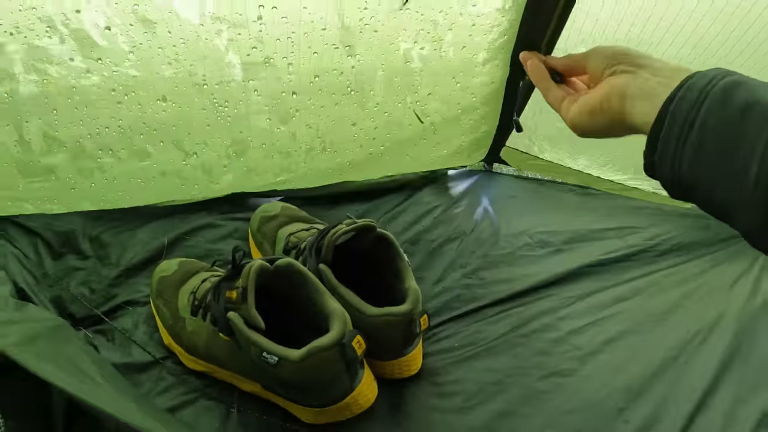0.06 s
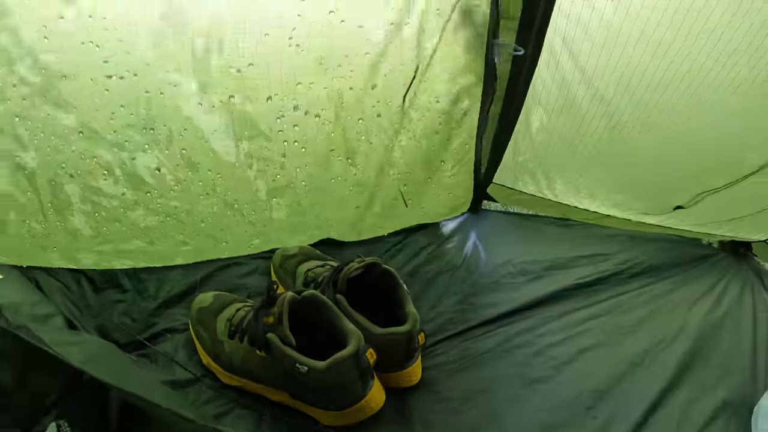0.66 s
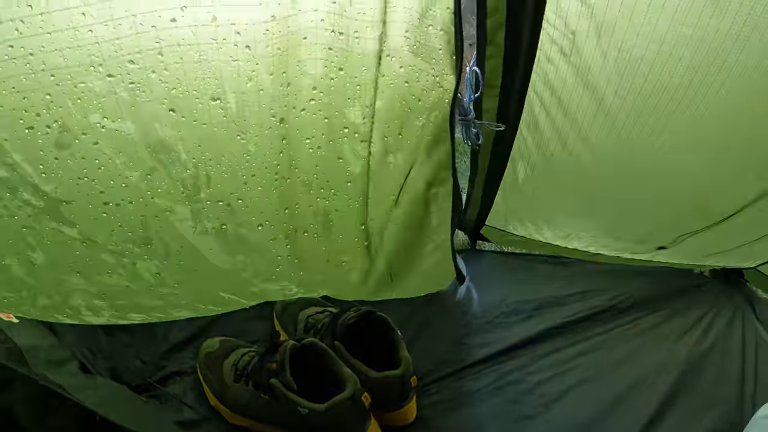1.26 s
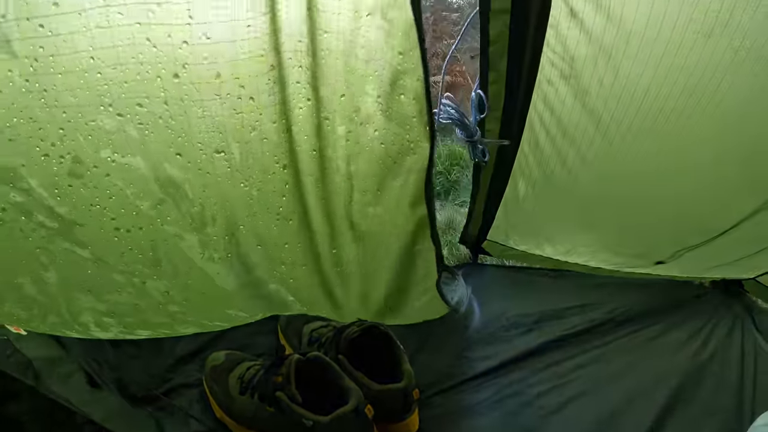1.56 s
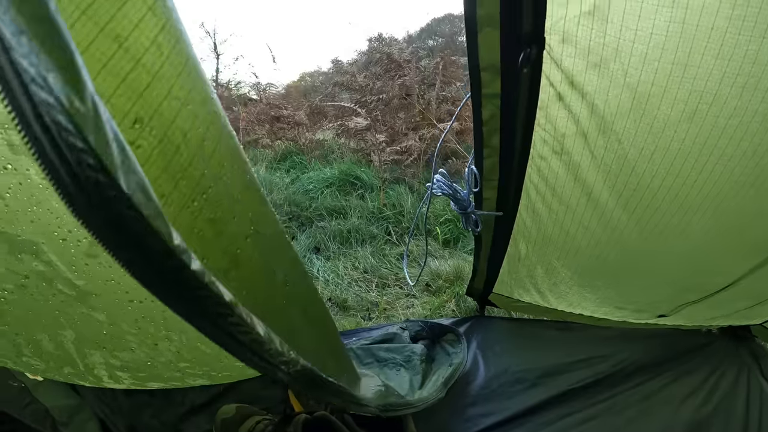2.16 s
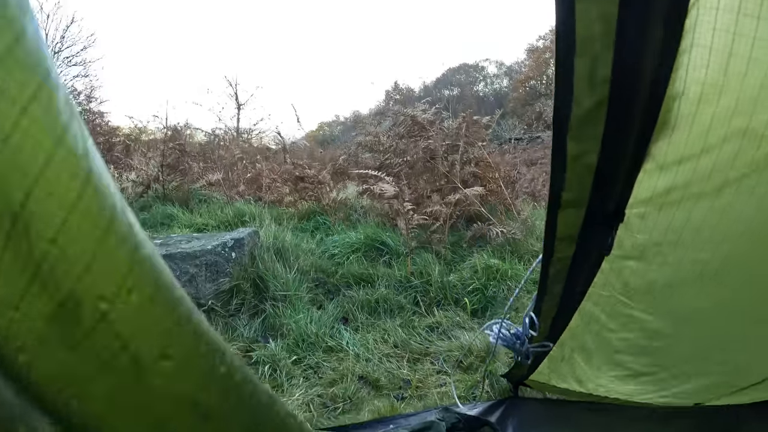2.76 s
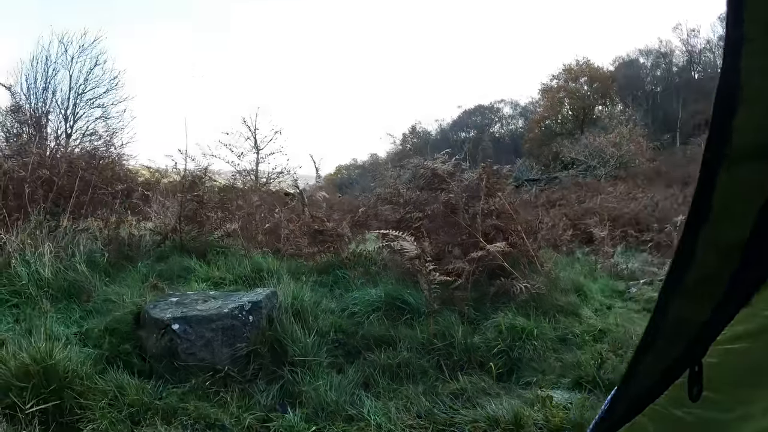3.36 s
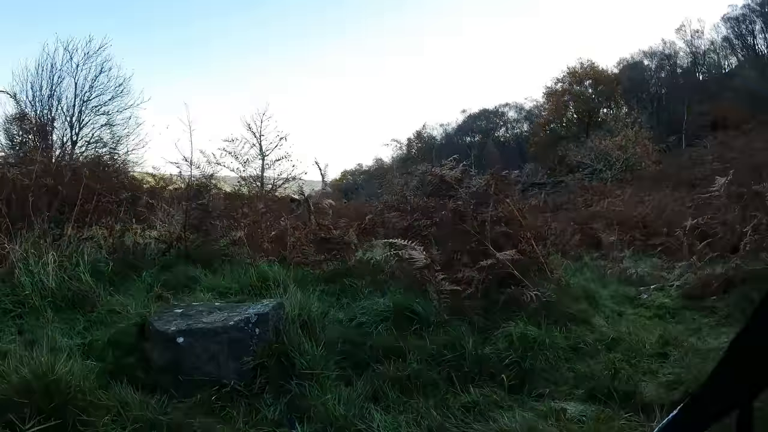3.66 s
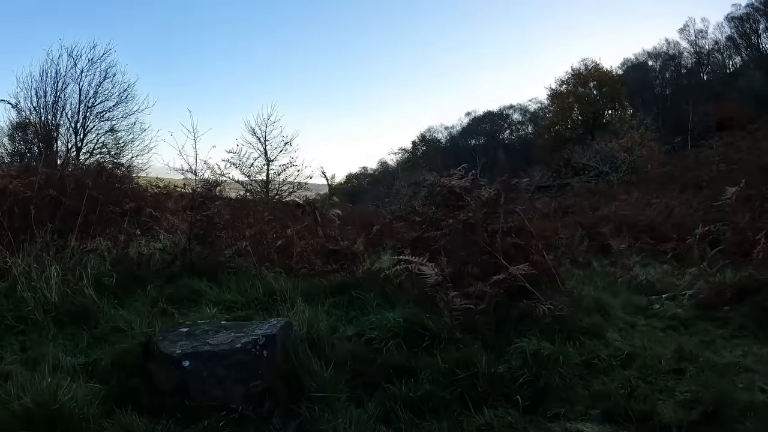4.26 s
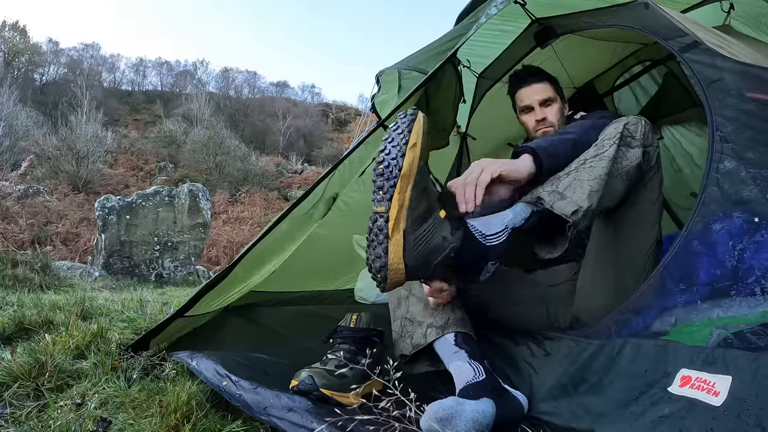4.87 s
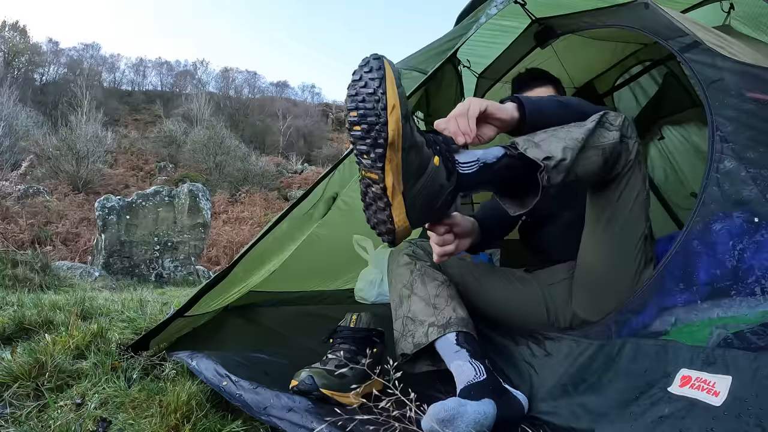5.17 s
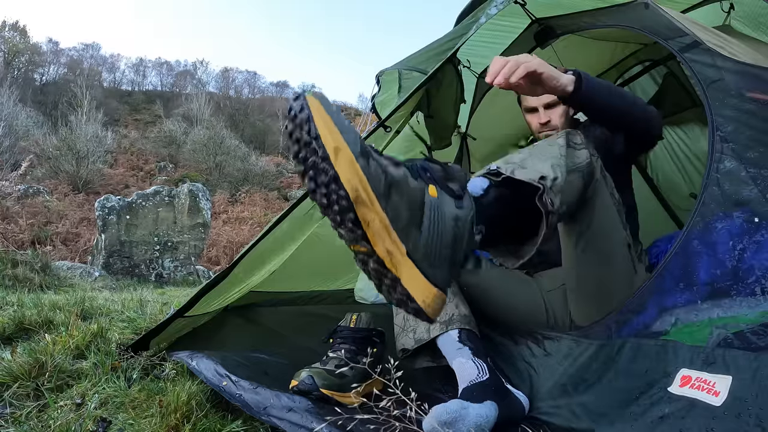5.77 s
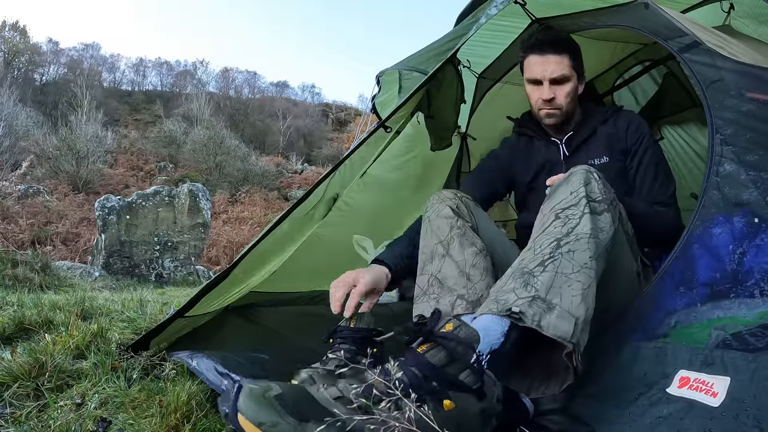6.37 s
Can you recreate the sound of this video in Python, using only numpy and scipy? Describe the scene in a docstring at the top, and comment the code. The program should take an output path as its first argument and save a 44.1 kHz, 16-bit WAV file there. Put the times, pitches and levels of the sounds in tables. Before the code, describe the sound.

A long, close rasp of a tent door zip slows to clicks, followed by wind bumps and the rustle and pop of a shoe going on.

```python
"""A tent door zip buzzes open close to the microphone: the slider runs over the teeth, slows and ends
in single clicks. The door cloth brushes past; wind, handling and soft bumps rumble in the microphone
ports over a faint outdoor hush. Then, with a low hum in the distance, a shoe is tugged onto a foot,
pops home and is set down among rustling clothes."""
import sys
import numpy as np
from scipy import signal
from scipy.fft import rfft, irfft, next_fast_len
from scipy.io import wavfile
from scipy.ndimage import uniform_filter1d, map_coordinates

SR = 44100
rng = np.random.default_rng(int(sys.argv[2]) if len(sys.argv) > 2 else 0)


def generate_wav(signal):
    """Clip the signal to [-1, 1] and save it as 16-bit WAV at the path in sys.argv[1]."""
    frames = np.transpose(np.atleast_2d(signal))
    scaled = np.clip(frames, -1, 1) * 32767
    pcm = np.round(scaled).astype(np.int16)
    wavfile.write(sys.argv[1], SR, pcm)


N = 286721
TOP_HZ = 15100  # the microphone's band limit


def amp(db):
    """Decibels to gain."""
    return 10 ** (np.asarray(db) / 20)


def unit(x):
    """Scaled to rms 1."""
    return x / np.sqrt(np.mean(x ** 2) + 1e-20)


def even(x, size=2205):
    """Scaled to a running rms of 1."""
    power = np.abs(uniform_filter1d(uniform_filter1d(x * x, size), size))
    return x / np.sqrt(power + 1e-9 * np.mean(x * x))


def along(points, hz):
    """Read (f/Hz, value) points on a log frequency axis."""
    f, v = np.transpose(points)
    return np.interp(np.log(hz + 1), np.log(f + 1), v)


def clock():
    """Time of each sample."""
    return np.arange(N) / SR


def gains(rows):
    """A gain per sample for each dB column, fading out beyond the rows."""
    s, *cols = np.transpose(rows)
    outside = np.maximum(0, np.maximum(s[0] - clock(), clock() - s[-1]))
    return [amp(np.interp(clock(), s, c)) * np.exp(-outside / 0.15) for c in cols]


def strokes(rows, shape=1.34):
    """Swells (t/s, level/dB, rise/s, fall/s) added in power; shape 1 is pointed, 2 bell-like."""
    power = 0
    for s, db, rise, fall in rows:
        t = clock() - s
        flank = np.abs(t / np.where(t < 0, rise, fall)) ** shape
        power += (amp(db) * np.exp(-np.minimum(flank, 20))) ** 2
    return np.sqrt(power)


def wobble(rate, size=N):
    """A smooth random curve, rate knots a second."""
    knots = rng.standard_normal(int(size * rate / SR) + 4)
    return map_coordinates(knots, [np.arange(size) * rate / SR])


def filtered(x, response):
    """x times a response of frequency."""
    m = next_fast_len(x.shape[-1] + 8192, True)
    return irfft(rfft(x, m) * response(np.fft.rfftfreq(m, 1 / SR)), m)[..., :x.shape[-1]]


def noise(spectrum):
    """Coloured noise of rms 1."""
    return unit(filtered(rng.standard_normal(N), lambda hz: amp(along(spectrum, hz))))


def struck(x, spectrum, size=2048):
    """x through a causal (minimum-phase) body with this spectrum."""
    cepstrum = irfft(np.log(amp(along(spectrum, np.fft.rfftfreq(size, 1 / SR)))))
    cepstrum[1:size // 2] *= 2
    cepstrum[size // 2 + 1:] = 0
    return signal.oaconvolve(x, irfft(np.exp(rfft(cepstrum))))[:len(x)]


def resonate(x, modes):
    """x through (f/Hz, width/Hz, level/dB) resonances."""
    return filtered(x, lambda f: sum((-1) ** k * amp(db) * 1j * f * w / (c * c - f * f + 1j * f * w)
                                     for k, (c, w, db) in enumerate(modes)))


def grainy(spectrum, grain_db, rate):
    """Friction noise of rms 1: threads catch and let go rate times a second."""
    return unit(struck(rng.standard_normal(N) * amp(grain_db * wobble(rate)), spectrum))


def around(spectrum, hz):
    """A spectrum narrowed towards hz."""
    return [(f, db - 2.4 * np.log2(f / hz) ** 2) for f, db in spectrum]


def tinted(x, rows, octaves, folds_db=1.9):
    """Lift a gliding band of (t/s, f/Hz, lift/dB) rows; shifting folds add chance colour."""
    hz, s, z = signal.stft(x, SR, nperseg=512)
    at, centre, lift_db = np.transpose(rows)
    folds = uniform_filter1d(uniform_filter1d(rng.standard_normal(z.shape), 3, axis=0), 8, axis=1)
    band = np.exp(-(np.log2((hz[:, None] + 1) / np.interp(s, at, centre)) / octaves) ** 2)
    colour_db = np.interp(s, at, lift_db) * band + folds_db * unit(folds)
    return signal.istft(z * amp(colour_db), nperseg=512)[1][:N]


def add(track, s, sound):
    """Mix a sound in at time s."""
    part = track[round(s * SR):][:len(sound)]
    part += sound[:len(part)]


# open air around the tent: f/Hz, level/dB (table levels are relative throughout)
HUSH = [(76, -57), (130, -11.5), (152, -8), (205, -11), (311, -20.5), (542, -25.5), (856, -26), (2980, -31),
        (5200, -34.5), (7140, -38), (9430, -50), (11700, -42.5), (14900, -60)]
def outdoor_hush():
    """Faint, wide air: part is common to both channels, part is each one's own."""
    return amp(-65) * (noise(HUSH) + 1.19 * np.array([noise(HUSH), noise(HUSH)]))


# tones of the hum, and the noise around them: f/Hz, level/dB
HUM = [(91.5, -53), (150.7, -52), (188.4, -59.5)]
DRONE = [(30, 1.5), (80, 12.5), (125, -24), (185, -8), (260, -5), (350, -15), (700, -16), (2000, -21),
         (8000, -50)]
def distant_hum():
    """Far off, low tones waver in a bed of noise, fading in at 4.4 s."""
    tones = sum(amp(db + 2.5 * wobble(9.9)) * np.sin(2 * np.pi * hz * clock() + 2 * wobble(13))
                for hz, db in HUM)
    return (tones + amp(-53.5) * noise(DRONE)) * np.clip((clock() - 4.4) / 0.24, 0, 1)


# strength of the wind, and of handling as the microphone is carried out: t/s, level/dB
WIND = [(0, -28.5), (1.5, -35), (2.2, -31), (3.4, -32), (3.8, -29), (4.55, -35), (5, -43.5), (5.2, -76),
        (5.9, -79), (6.05, -48), (6.5, -50.5)]
CARRY = [(1.95, -56), (2.12, -35), (2.6, -43.5), (4.3, -66), (4.6, -70)]
# their spectra: f/Hz, level/dB
WIND_RUMBLE = [(8, -5), (14, 5), (22, 3), (30, -23.5), (45, -9.5), (65, -26.5), (90, -26), (130, -43),
               (200, -59), (300, -117)]
HANDLING = [(20, -24), (40, -5), (65, 21), (90, 8.5), (120, 2), (200, -34), (400, -83)]
def microphone_rumble():
    """Wind and handling right on the microphone ports, stronger on the right."""
    ports = amp([[-3], [2]])
    gusts = even(noise(WIND_RUMBLE), size=4410) * ports
    gusts += 0.27 * np.array([noise(WIND_RUMBLE), noise(WIND_RUMBLE)])
    handling = gains(CARRY)[0] * even(noise(HANDLING)) * ports
    return amp(3) * gains(WIND)[0] * gusts + handling


# blows to the microphone and of the shoe: t/s, level/dB, f/Hz, t60/s, rise/s
BUMPS = [(2.718, -40.5, 288, 0.044, 0.0034), (3.484, -1, 23.6, 0.29, 0.028), (3.501, -19, 61.6, 0.3, 0.002),
         (3.886, -18, 69, 0.13, 0.0094), (4.25, -10.5, 66.6, 0.13, 0.0091),
         (4.25, -42.5, 258, 0.035, 0.0019), (4.294, -19.5, 29.1, 0.29, 0.024),
         (4.493, -15.5, 23.5, 0.22, 0.031), (5.208, -30.5, 88, 0.073, 0.0039),
         (5.509, -8, 64.4, 0.063, 0.0038), (5.508, -20, 800, 0.0044, .0006),
         (5.511, -21, 234, 0.025, 0.00068), (5.667, -18.5, 178.4, 0.046, 0.0089),
         (6.098, -25.5, 40.6, 0.24, 0.0053), (6.125, -25.5, 85, 0.07, 0.0032)]
def bumps():
    """Each soft blow swings a few cycles of a dying tone."""
    out, t = np.zeros(N), np.arange(SR // 2) / SR
    for s, db, hz, t60, rise in BUMPS:
        onset = 1 - np.exp(-(t / rise) ** 2)
        add(out, s, amp(db - 60 * t / t60) * onset * np.sin(2 * np.pi * hz * t))
    return out


# knocks of the shoe: t/s, level/dB
KNOCKS = [(5.485, -31), (5.508, -18.5), (6.068, -31.5), (6.101, -29), (6.298, -32), (6.328, -29.5)]
# body of the sole: f/Hz, level/dB
SOLE = [(60, -42), (140, 6), (350, -3.5), (600, -10), (1100, -12.5), (2000, -15), (4500, -29),
        (12000, -56.5)]
def shoe_knocks(grit=0.18):
    """The sole knocks dully: one push, then a short crunch."""
    out, t = np.zeros(N), np.arange(SR // 2) / SR
    for s, db in KNOCKS:
        crunch = grit * rng.standard_normal(len(t)) * amp(-60 * t / 0.039)
        knock = struck((t == 0) + crunch, SOLE)
        add(out, s, amp(db) * knock / np.abs(knock).max())
    return out


# door cloth, then a sleeve: t/s, level/dB, rise/s, fall/s
BRUSHES = [(2.22, -41.5, 0.054, 0.085), (2.38, -54, 0.078, 0.39), (2.97, -59, 0.93, 0.14),
           (3.42, -51, 0.34, 0.23), (3.51, -44, 0.031, 0.041), (4.02, -63, .02, .05),
           (4.16, -62, 0.078, 0.089), (4.37, -60.5, 0.071, 0.04)]
# sliding nylon: f/Hz, level/dB
NYLON = [(150, -8), (280, 1), (500, -2), (800, -8.5), (1100, 1.5), (1900, -4), (3500, -6.5), (5300, -7),
         (8500, -16.5), (12000, -22), (15000, -32)]
def cloth_brush():
    """Cloth slides past the microphone in swells of friction noise."""
    return amp(-3.5) * strokes(BRUSHES) * grainy(NYLON, grain_db=2, rate=220)


# strokes of sock, shoe and trousers: t/s, swish/dB, rise/s, fall/s, scuff/dB, hiss/dB, brightest f/Hz
RUBS = [(4.645, -57.5, 0.055, 0.071, -70, -70, 1490), (4.78, -58.5, 0.041, 0.055, -58.5, -74, 1500),
        (4.875, -58, 0.052, 0.044, -52.5, -74, 1960), (5.025, -50.5, 0.08, 0.022, -48.5, -73, 1800),
        (5.07, -44.5, 0.058, 0.048, -46.5, -55.5, 3160), (5.19, -49.5, 0.15, 0.17, -58, -61, 2340),
        (5.37, -51, 0.13, 0.12, -66, -63.5, 1400), (5.495, -37.5, 0.047, 0.042, -39.5, -48.5, 2360),
        (5.679, -45, 0.022, 0.038, -61, -54, 2600), (5.725, -50.5, 0.075, 0.046, -75, -55, 2760),
        (5.975, -55, 0.063, 0.065, -58, -61.5, 2430), (6.095, -45, 0.04, 0.049, -41, -47, 1710),
        (6.305, -40, 0.064, 0.04, -41.5, -42.5, 1100), (6.45, -46, 0.072, 0.077, -47, -49.5, 2120)]
# low, middle and high part of a rub: f/Hz, level/dB
SCUFF = [(70, -23), (130, 2), (280, 3), (550, -2.5), (1000, -17), (1400, -19), (2500, -38)]
SWISH = [(450, -8), (650, -1), (880, -4), (1200, 3), (1750, 0), (2450, -0.5), (3200, 0), (5200, -7),
         (8000, -40), (12000, -62)]
HISS = [(2940, -16.5), (5000, -5), (7270, -6), (8840, -14), (10100, -13), (13800, -26), (14600, -49),
        (14900, -47)]
def shoe_rubs(lift_db=5):
    """As the shoe is tugged on, each rub gives a low scuff, a swish and a hiss."""
    s, swish_db, rise, fall, scuff_db, hiss_db, hz = np.transpose(RUBS)
    scuff, swish, hiss = (strokes(zip(s, db, rise, fall)) for db in (scuff_db, swish_db, hiss_db))
    bright = [(at, centre, lift_db) for at, centre in zip(s, hz)]
    scuff *= amp(-3) * grainy(SCUFF, grain_db=3.5, rate=300)
    swish *= even(tinted(grainy(SWISH, grain_db=1.5, rate=610), bright, octaves=1))
    hiss *= amp(-1.5) * grainy(HISS, grain_db=1.5, rate=450)
    return scuff + swish + hiss


# brief sounds of zip, cloth and shoe: t/s, level/dB, centre f/Hz, t60/s
SHIVERS = [(1.704, -33, 4860, 0.029), (1.808, -35.5, 9000, 0.035), (2.754, -44, 3720, 0.046),
           (2.977, -51.5, 7000, 0.02), (3.352, -40.5, 3980, 0.055), (3.413, -42, 4200, 0.053),
           (3.498, -35, 1940, 0.03), (4.702, -45, 3200, 0.014), (5.482, -35.5, 1910, 0.18),
           (5.493, -35, 950, 0.046), (5.508, -23, 900, 0.02), (5.657, -43.5, 1790, 0.069),
           (5.806, -44.5, 2620, 0.029), (6.066, -41, 1600, 0.041), (6.287, -38, 820, 0.17),
           (6.33, -39, 1100, 0.042)]
# their shared body: f/Hz, level/dB
SHIVER_BODY = [(200, 3), (450, 20), (750, -4), (1100, 6), (1500, 3), (1900, -0.5), (2500, -1.5), (3200, -1),
               (4300, -2.5), (6000, -7), (9000, -17.5), (15000, -28)]
def snags_and_pops():
    """The slider snags, pullers and cloth flick, the shoe scrapes, squeaks and pops: shivers of noise."""
    out, t = np.zeros(N), np.arange(SR // 6) / SR
    for s, db, hz, t60 in SHIVERS:
        shiver = unit(struck(rng.standard_normal(len(t)), around(SHIVER_BODY, hz)))
        add(out, s, amp(db - 60 * t / t60) * shiver)
    return out


# the zip's last teeth: t/s, crack/dB, centre f/Hz, thud/dB
LAST_TEETH = [(2.2752, -32, 1504, -30), (2.2874, -37, 1500, -33.5), (2.3, -47, 1710, -33),
              (2.3171, -35, 1302, -37), (2.3304, -35, 1200, -35), (2.343, -39, 1400, -36),
              (2.3585, -33, 1300, -33), (2.368, -33, 1300, -35), (2.38, -34, 1700, -30),
              (2.3935, -33, 1810, -26), (2.4132, -30, 1290, -30), (2.45, -33, 1860, -30),
              (2.496, -35, 1020, -35.5), (2.529, -32.5, 1060, -31), (2.555, -37, 1670, -40),
              (2.61, -39.5, 1000, -46), (2.635, -32, 1050, -35), (2.642, -38, 1010, -43)]
# a tooth's crack, and its tug on the cloth: f/Hz, level/dB
CRACK = [(200, 7), (320, -4), (430, 13.5), (750, -6), (1050, 4.5), (1450, -3), (1900, 1), (2500, -3),
         (3100, -1), (4200, -4), (6000, -3), (9000, -11), (12000, -5), (15000, -24)]
THUD = [(30, -10), (110, 2.5), (260, 0.5), (450, -11.5), (900, -20), (3000, -47)]
def last_teeth(crack_t60=0.014, tail_t60=0.065, tail_db=-16):
    """Teeth let go one by one: a crack, a short shiver and a thud of the cloth."""
    out, t = np.zeros(N), np.arange(SR // 6) / SR
    decay = amp(-60 * t / crack_t60) + amp(tail_db - 60 * t / tail_t60)
    thud = struck(-1. * (t == 0), THUD)
    for s, db, hz, thud_db in LAST_TEETH:
        crack = struck(rng.standard_normal(len(t)) * decay, around(CRACK, hz))
        add(out, s, amp(db + 15.5) * crack / np.linalg.norm(crack))
        add(out, s, amp(thud_db + 3.5) * thud / np.abs(thud).max())
    return out


# two tugs on the door: t/s, level/dB, rise/s, fall/s
TUGS = [(2.08, -37.5, 0.11, 0.17), (2.23, -31.5, 0.062, 0.061)]
# door cloth modes: f/Hz, width/Hz, level/dB
DOOR_MODES = [(106.9, 29.9, 4.5), (158.8, 15, 6), (210, 42.6, 0), (286, 52, -2), (414, 21.9, -3.5),
              (507, 18, -11)]
def slack_door(kicks, bursts, stop_s):
    """The teeth drum the loosened door until the slider's run ends."""
    drum = even(resonate(kicks + 0.037 * bursts * rng.standard_normal(N), DOOR_MODES))
    return drum * strokes(TUGS) * np.clip((stop_s - clock()) / 0.018 + 1, 0, 1)


# rattles of the tab: t/s, level/dB, rise/s, fall/s
RATTLES = [(2.055, -50, .025, 0.026), (2.135, -45.5, .015, .02), (2.235, -46.5, 0.047, 0.035)]
# its modes: f/Hz, width/Hz, level/dB
TAB_MODES = [(3170, 83, 0), (5000, 176, -11), (5785, 250, -7)]
def pull_tab(grit):
    """The pull tab rattles on slow teeth."""
    return strokes(RATTLES) * even(resonate(grit, TAB_MODES))


# the tape's four lowest partials: t/s, then level/dB of each
BUZZ = [(0.0, -51, -45.5, -62, -46.5), (0.09, -57, -44, -74, -40), (0.19, -52, -57, -60, -40),
        (0.25, -40.5, -41, -45, -38), (0.39, -36.5, -34, -48, -38.5), (0.45, -31.5, -33.5, -33, -49.5),
        (0.58, -39.0, -38.5, -51, -33), (0.65, -38.5, -38, -42.5, -50), (0.71, -38, -36, -38, -41),
        (0.85, -47.5, -43.5, -43.5, -35), (0.93, -40, -38.0, -38, -37), (1.03, -39, -41.5, -51, -37),
        (1.13, -43.5, -54.5, -46, -49), (1.22, -37.5, -36.5, -50, -45), (1.27, -52, -46, -61.5, -42),
        (1.34, -48.0, -41.5, -56.0, -59), (1.4, -39, -49.5, -54, -45), (1.49, -40.5, -43.5, -70, -46),
        (1.61, -42.5, -60, -70, -46.5), (1.71, -38, -50.5, -80, -58), (1.8, -43.5, -45, -51, -45.5),
        (1.89, -47, -59, -52, -53.5), (1.95, -42.5, -50.5, -69.0, -48)]
def tape_buzz(teeth, steady, waver_db=2.4, swell_db=0.7, shake_rad=0.52):
    """The tape buzzes at the tooth rate, shakier in higher partials and where the pull is uneven."""
    out = np.zeros(N)
    for k, level in enumerate(gains(BUZZ), 1):
        waver = unit(amp(waver_db * wobble(140) + swell_db * k * wobble(40)))
        shake = shake_rad * k * (1 - steady) * wobble(110)
        out += np.sqrt(2) * level * waver * np.cos(2 * np.pi * k * teeth + shake)
    return out


# rasp of the teeth: f/Hz, level/dB
RASP = [(1200, -21.5), (2000, -6), (2550, 0), (3200, 1.5), (4200, -2.5), (5300, -1.5), (6900, -5),
        (8300, -13), (10000, -13.5), (11000, -19.5), (12100, -15.5), (15000, -34)]
# the slider's gliding band: t/s, f/Hz, lift/dB
SLIDER_BAND = [(0, 3600, 2), (.5, 4050, -2), (.75, 3220, 5), (.95, 3780, 8.5), (1.12, 4310, 4.5),
               (1.45, 4772, 6.5), (1.75, 4560, 4), (1.9, 2657, 1), (2.1, 2940, 6), (2.3, 2940, 7)]
def slider_rasp(bursts):
    """Each tooth scrapes through the slider in a bright burst of noise."""
    return even(tinted(struck(bursts * rng.standard_normal(N), RASP), SLIDER_BAND, octaves=0.55))


def teeth_ring(teeth, rate, spectrum, reach_hz, waver_db, smear):
    """Upper partials of the tooth rate swell, fade and wander as the slider travels along the cloth."""
    out = np.zeros(len(teeth))
    for k in range(5, 21):
        swing, drift = wobble(24, len(teeth)), wobble(70, len(teeth))
        level = amp(along(spectrum, k * rate) + waver_db * swing)
        level /= np.sqrt(1 + (k * rate / reach_hz) ** 4)
        phase = 2 * np.pi * k * teeth + smear * np.sqrt(k) * drift + rng.uniform(0, 2 * np.pi)
        out += level * np.cos(phase)
    return even(np.pad(out, (0, N - len(teeth))))  # silent once the teeth come singly


# the slider's speed: t/s, tooth rate/Hz
SPEED = [(0, 272), (0.093, 313), (0.129, 280), (0.18, 308), (0.21, 349), (0.3, 376), (0.412, 419),
         (0.471, 420), (0.54, 387), (0.596, 377), (0.615, 308), (0.64, 288), (0.685, 338), (0.72, 317),
         (0.78, 286), (0.824, 244), (0.86, 272), (0.885, 253), (0.93, 305), (0.985, 300), (1.042, 227),
         (1.08, 315), (1.172, 327), (1.25, 240), (1.318, 167), (1.356, 198), (1.416, 272), (1.445, 262),
         (1.472, 342), (1.499, 298), (1.552, 284), (1.644, 243), (1.709, 250), (1.764, 236), (1.819, 262),
         (1.872, 187), (1.96, 153), (2.069, 109), (2.222, 139), (2.31, 96)]
# evenness of the pull: t/s, tonal share (0-1)
STEADY = [(0, 0.7), (.4, 0.57), (.95, 0.55), (1.08, 0.35), (1.45, 0.63), (1.75, 0.3), (2.1, 0.1)]
# strength of the zip's layers: t/s, tape rubbing/dB, chatter/dB, rasp/dB
PULL = [(0.0, -42.5, -38.5, -36.5), (0.14, -44.5, -45, -40.5), (0.17, -36, -39.5, -38.5),
        (0.31, -40, -43, -35), (0.39, -39, -38.5, -32.5), (0.51, -41.5, -48, -35), (0.57, -47, -36.5, -33),
        (0.63, -38, -39.5, -36), (0.77, -39.5, -34.5, -33.5), (0.83, -45, -37.5, -35.5),
        (0.9, -40, -34.5, -33), (0.96, -46, -37.5, -34.5), (1.07, -39.0, -36.5, -31),
        (1.16, -40, -38.5, -32), (1.33, -39, -46.5, -40.5), (1.4, -44, -38.5, -36.5),
        (1.47, -42.5, -43.5, -37), (1.58, -41, -39.5, -42), (1.71, -41.5, -37, -39.5),
        (1.77, -45.5, -45.5, -43), (1.87, -46, -42, -44), (1.97, -44.0, -48.5, -48.5),
        (2.05, -49, -49, -45), (2.11, -41, -49.5, -44.5), (2.24, -49, -46.0, -45.5),
        (2.26, -47, -47.5, -49), (2.31, -47, -57, -56)]
# the tape's rubbing, the teeth's chatter and their whine at top speed: f/Hz, level/dB
TAPE = [(60, -4.5), (150, 1.5), (300, -2.5), (500, -3.5), (1050, 2.5), (1400, 2.5), (2200, -20),
        (6000, -34.5)]
CHATTER = [(800, -16.5), (1200, 0), (1450, 2), (1900, -1), (2400, -5.5), (3200, -9.5), (5200, -22.5),
           (15000, -52)]
WHINE = [(1700, -18), (2400, -2), (3000, -3), (3700, 2.5), (5200, -3), (7000, -22), (8500, -19)]
def zipper(stutter=0.025, tooth_s=0.0025, catch_db=0.73, catch_hz=32):
    """Close up, each tooth snaps out of the slider with a click and a rasp, shaking tape, door and tab."""
    steady = np.clip(np.interp(clock(), *np.transpose(STEADY)), 0, 1)
    rate = np.interp(clock(), *np.transpose(SPEED)) * np.exp(stutter * wobble(55))
    speed = rate / rate.max()
    teeth = np.cumsum(rate) / SR  # teeth passed so far
    stop_s = SPEED[-1][0]
    end = int(stop_s * SR)
    tooth = np.arange(1, int(teeth[end]) + 1)
    slip, size_db, tug = rng.standard_normal((len(tooth), 3)).T
    # a slack, slow zip lets its teeth go unevenly
    scatter = 0.03 + 0.09 * (1 - np.interp(tooth, teeth, steady)) ** 3
    at = np.interp(tooth + scatter * slip, teeth, np.arange(N)).astype(int)
    snaps = np.bincount(at, amp(size_db), N)
    # steady rubbing fills the gaps between teeth only at speed
    bursts = signal.lfilter([1], [1, -np.exp(-1 / (tooth_s * SR))], snaps) + speed ** 1.8

    ring = teeth_ring(teeth[:end], rate[:end], CHATTER, reach_hz=2200, waver_db=7, smear=0.52)
    whine = teeth_ring(teeth[:end], rate[:end], WHINE, reach_hz=TOP_HZ, waver_db=5.5, smear=0.36)
    grit = snaps + 0.27 * bursts * rng.standard_normal(N)
    clicks = even(struck(grit, CHATTER))
    tape, chatter, rasp = gains(PULL)
    tape *= amp(-2) * even(struck(grit, TAPE))
    # an even pull rings, an uneven one clicks
    chatter *= amp(-0.5) * np.sqrt(steady) * ring + amp(-0.7) * np.sqrt(1 - steady) * clicks
    sung = amp(-2.8) * speed ** 1.2  # at speed, part of the rasp turns to a whine
    rasp *= amp(-1.07) * np.sqrt(1 - 0.5 * sung ** 2) * slider_rasp(bursts) + sung * whine
    door = slack_door(snaps + 0.52 * np.bincount(at, tug, N), bursts, stop_s)
    buzz = tape_buzz(teeth, steady)
    catch = amp(catch_db * wobble(catch_hz))  # the slider catches and frees
    return buzz + catch * (tape + chatter + rasp) + door + pull_tab(grit)


# stereo image at the microphone: f/Hz, left-right likeness (0-1)
LIKENESS = [(30, 0.98), (250, 0.99), (600, 0.94), (1100, 0.91), (2500, 0.75), (5000, 0.84), (9000, 0.75),
            (12500, 0.32)]
def tent_walls(x, size=2048):
    """The swaying tent walls scatter the sound differently to each side, most in the treble."""
    t = np.arange(size) / SR
    scatter = rfft(rng.standard_normal((2, size)) * np.exp(-t / 0.008) * (t > 0.002))
    scatter /= np.sqrt(uniform_filter1d(np.abs(scatter) ** 2, size=9))
    first, second = signal.oaconvolve(x[None], irfft(scatter), axes=1)[:, :N]
    sway = 2 * wobble(5)
    scattered = first * np.cos(sway) + second * np.sin(sway)
    alike = lambda hz: np.clip(along(LIKENESS, hz), 0, 1)
    side = filtered(scattered, lambda hz: np.sqrt((1 - alike(hz)) / (1 + alike(hz))))
    return np.array([x + side, x - side])


def scene():
    """A stereo microphone at the tent door; the early bumps shake its right port more."""
    close = tent_walls(zipper() + last_teeth() + snags_and_pops() + cloth_brush() + shoe_rubs())
    lean = 0.27 * (clock() < 4.5)
    blows = (bumps() + shoe_knocks()) * np.array([1 - lean, 1 + lean])
    return close + blows + microphone_rumble() + outdoor_hush() + distant_hum()


def record(dry):
    """The microphone keeps nothing above its band limit."""
    return filtered(dry, lambda hz: hz < TOP_HZ)


dry = scene()
out = record(dry)
generate_wav(out)
```